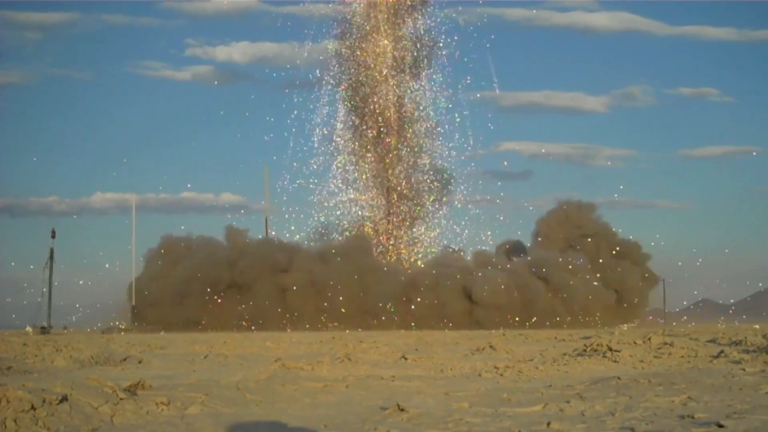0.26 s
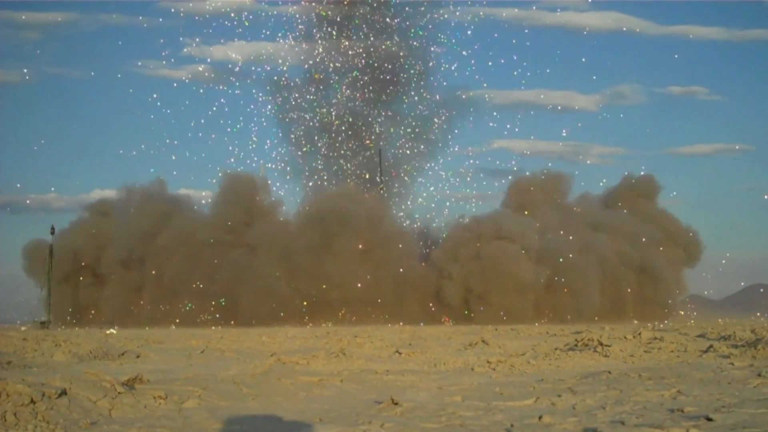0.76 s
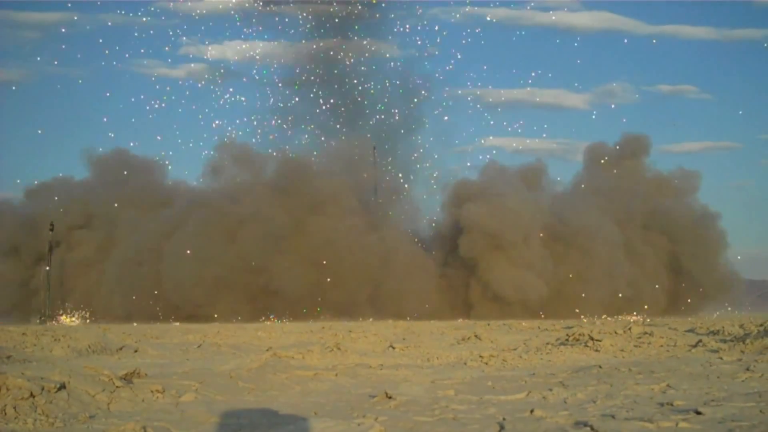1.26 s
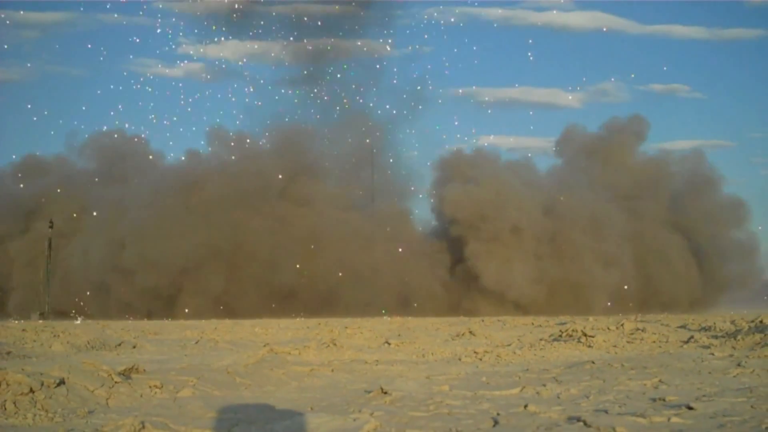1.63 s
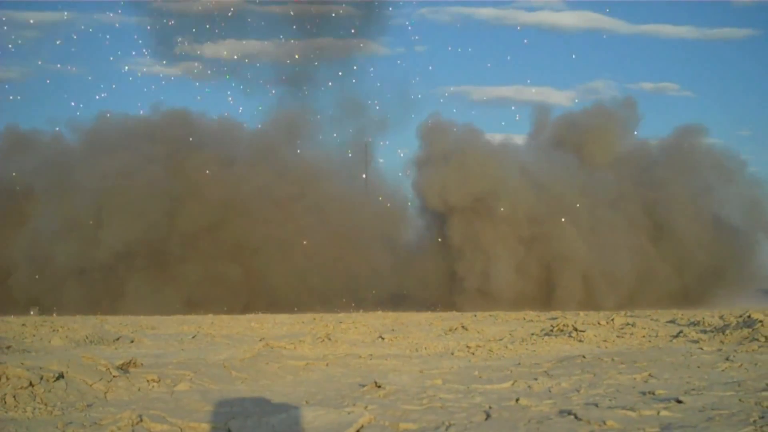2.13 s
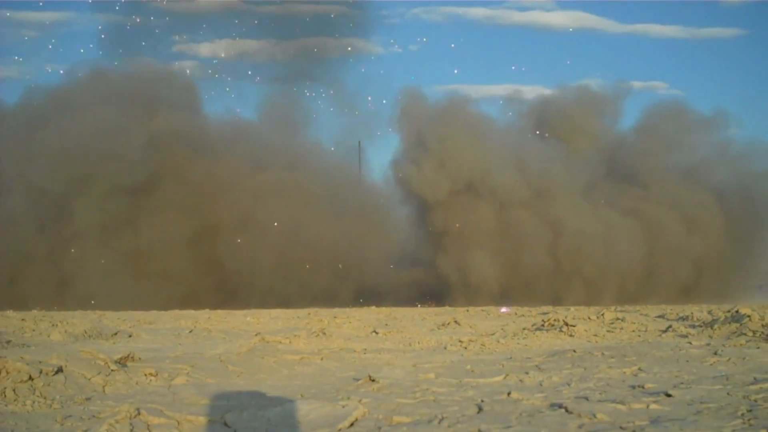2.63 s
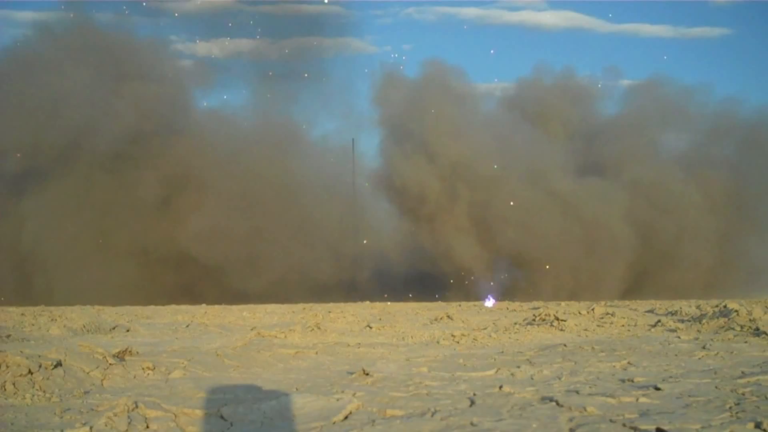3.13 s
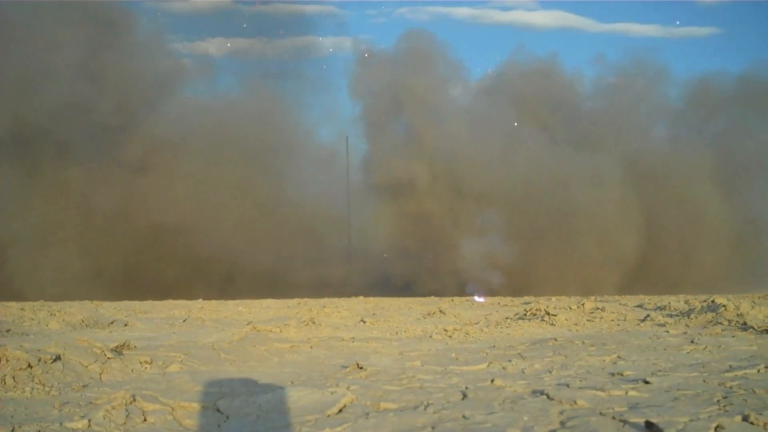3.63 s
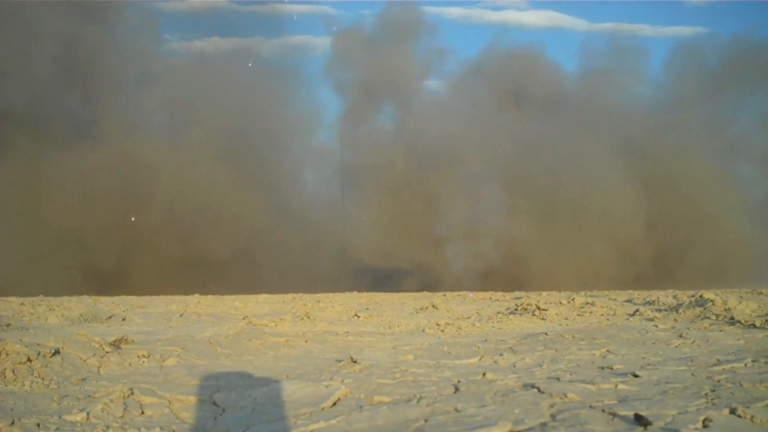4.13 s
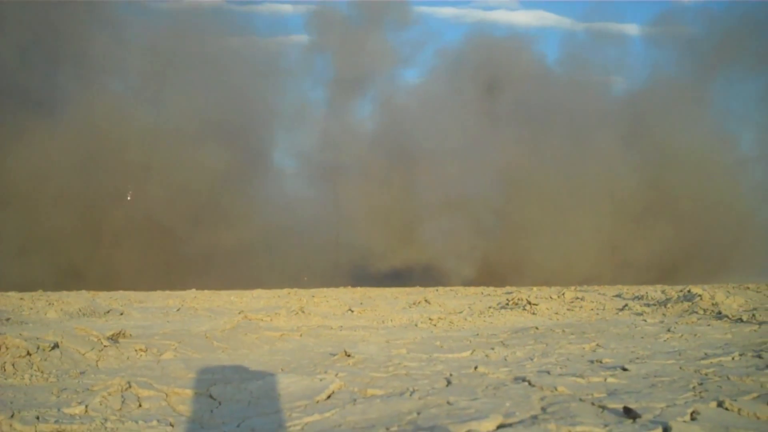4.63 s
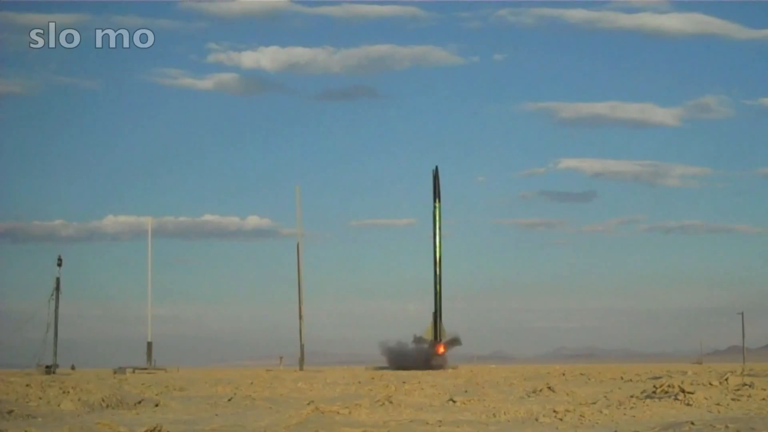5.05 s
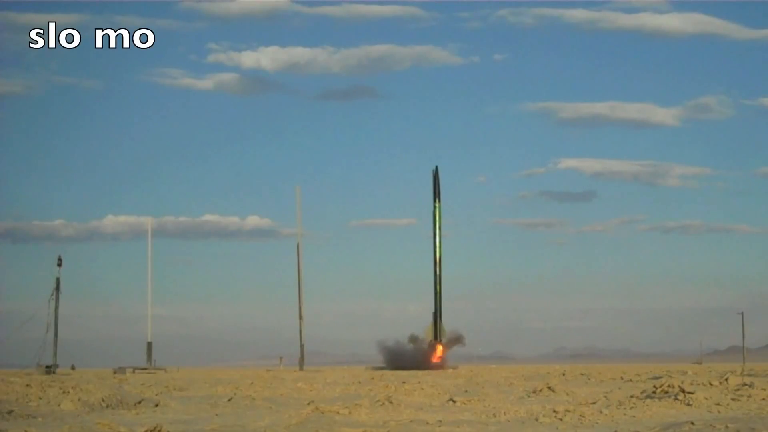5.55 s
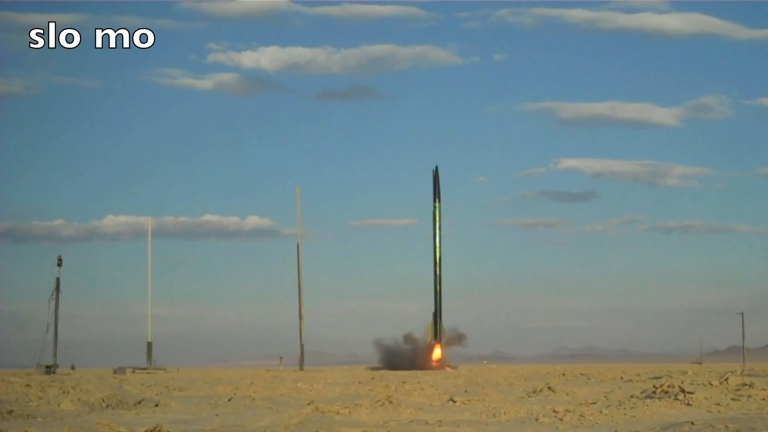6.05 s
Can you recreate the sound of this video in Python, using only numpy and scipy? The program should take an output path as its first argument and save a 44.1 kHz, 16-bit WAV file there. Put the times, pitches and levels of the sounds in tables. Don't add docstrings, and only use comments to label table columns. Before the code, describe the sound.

Harsh liftoff hiss turns to deep rumbling roar with sharp crackles and fizzing sparks, fades, then a slowed-down igniter hiss, soft thud and low gusts.

```python
import sys
import numpy as np
from scipy import signal
from scipy.io import wavfile
from scipy.ndimage import uniform_filter1d

SR = 44100
rng = np.random.default_rng(int(sys.argv[2]) if len(sys.argv) > 2 else 0)


def digitize_waveform(pressure):
    field = np.atleast_2d(pressure).T
    bounded = np.clip(field, -1, 1)
    quanta = np.round(bounded * 32767).astype(np.int16)
    wavfile.write(sys.argv[1], SR, quanta)


def to_linear_factor(level_db):
    exponent = np.asarray(level_db, float) / 20
    return 10 ** exponent


N = 277428
TIME = np.arange(N) / SR

CUT_S, FADE_S = 4.925, 0.096
SLOW, TOP_HZ = 4, 14120
ECHO_MS = .444
THUD_S = 5.578
SINCE_THUD_S = np.maximum(TIME - THUD_S, 0)
LIT = SINCE_THUD_S > .017


def columns(table, t=TIME):
    s, *rest = np.transpose(table)
    return [np.interp(t, s, c) for c in rest]


def bumps(table, t):
    return sum(size * np.exp(-((t - s) / half_s) ** 2) for s, size, half_s in table)


def noise(lo_hz, hi_hz, order=2):
    band = signal.butter(order, [lo_hz, hi_hz], "band", fs=SR, output="sos")
    x = signal.sosfilt(band, rng.standard_normal(N))
    return x / x.std()


def walk(rate_hz):
    k = int(SR / rate_hz)
    held = np.repeat(rng.standard_normal(N // k + 1), k)
    return 1.7 * uniform_filter1d(uniform_filter1d(held, k), k)[:N]


def grains(per_s, scatter_db):
    chance = rng.random((3, N))
    size = to_linear_factor(-scatter_db * np.log(1 - chance[2]))
    x = (chance[0] < per_s / SR) * np.sign(chance[1] - .5) * size
    return x / x.std()


def pair(a, b, like):
    like = np.clip(like, 0, 1)
    return np.sqrt((1 + like) / 2) * a + np.sqrt((1 - like) / 2) * b * np.array([[1], [-1]])


def clicks(table, lo_hz, hi_hz, tail_s):
    out = np.zeros((2, N))
    for s, db, *pan_db in table:
        after = TIME - s
        side_db = np.array([[.5], [-.5]]) * sum(pan_db)
        out += to_linear_factor(db + side_db) * (after >= 0) * np.exp(-np.maximum(after, 0) / tail_s)
    return out * noise(lo_hz, hi_hz)


def recorder_hiss():
    replay_hiss = to_linear_factor(-58) * rng.standard_normal((2, N)) * np.clip((TIME - CUT_S) / .04, 0, 1)
    top_cut = signal.ellip(12, .2, 70, TOP_HZ / SLOW, fs=SR, output="sos")
    replay_hiss = signal.sosfilt(top_cut, replay_hiss)
    floor_db = -65.5 - 16 * np.clip(1 - (TIME - 1.8) / 1.3, 0, 1)
    fade = np.clip((CUT_S - TIME) / FADE_S, 0, 1)
    floor = np.array([noise(8000, TOP_HZ, order=6) for _ in range(2)])
    return replay_hiss + to_linear_factor(floor_db) * fade * floor


def igniter_hiss():
    igniter_db = -42.5 - 11 * abs(TIME - 5.19)
    ember_db = -57.5 - 33 * abs(TIME - 5.95)
    hiss_db = np.where(LIT, ember_db, igniter_db)
    hiss = pair(noise(1200, 2230), noise(1100, 2200), 1.0) * to_linear_factor(hiss_db - 2.5 + 1.0 * walk(26))
    thin = pair(noise(1750, 2110), noise(1700, 1720), 0.64) * to_linear_factor(hiss_db - 0.5 + 2.8 * walk(25))
    return np.where(LIT, to_linear_factor(-14.5) * hiss + thin, hiss)


def low_rush():
    rush_db, ducked_db, left_db, recover_s = -55, -66, -59.5, 0.187
    recovering_db = left_db + (ducked_db - left_db) * np.exp(-SINCE_THUD_S / recover_s)
    level_db = np.where(LIT, recovering_db, rush_db) + 1.5 * walk(15)
    return pair(noise(310, 830, order=1), noise(270, 1300, order=1), 0.862) * to_linear_factor(level_db + 5.0)


def thrust_gusts():
    # (time [s], peak [dB], half length [s])
    gust_table = [(4.967, -46, .02), (5.144, -48, 0.102), (5.29, -41.5, 0.0487), (5.38, -43.5, .04),
                  (5.604, -38.5, 0.026), (5.75, -53, 0.138), (5.952, -45, 0.0363), (6.058, -43, 0.0223),
                  (6.15, -39.5, 0.046), (6.241, -42, .05)]
    gust = to_linear_factor(-60) + bumps([(s, to_linear_factor(db), half_s) for s, db, half_s in gust_table], TIME)
    return pair(noise(16, 130, order=3), noise(28, 140, order=3), 0.99) * gust


def thud():
    # (frequency [Hz], level [dB], t60 [s])
    modes = [(35, 3, 1), (61.2, -13, 0.31), (116.7, -0.5, 0.27)]
    ringing = sum(to_linear_factor(-27 + db - 60 * SINCE_THUD_S / t60_s) * np.sin(2 * np.pi * hz * SINCE_THUD_S)
                  for hz, db, t60_s in modes)
    return ringing * (1 - 0.646 * np.exp(-SINCE_THUD_S / 0.067))


def replay():
    # (time [s], peak [dB])
    tick_table = [(5.9652, -42), (6.1075, -49), (6.1584, -37.5), (6.2394, -49)]
    start = np.clip((TIME - CUT_S) / 0.065, 0, 1) ** 2
    ring = pair(noise(1010, 1098), noise(1010, 1130), 0.87) * to_linear_factor(-63.5 + 3 * walk(25))
    ring = ring * (TIME > 5.84) * (TIME < 6.2)
    ticks = clicks(tick_table, 880, 2900, 0.0054) * to_linear_factor(-6.5)
    flow = (igniter_hiss() + low_rush()) * start
    return (flow + ring + thrust_gusts() + thud() + ticks) * (TIME >= CUT_S)


def sparks():
    # (lands [s], dies [s], level [dB])
    showers = [(2.2, 4.4, -59), (2.72, 3.25, -57), (3.36, 5, -51)]
    # (time [s], peak [dB], left minus right [dB])
    pop_table = [(2.4834, -38, -3.5), (2.6594, -46, -4), (3.495, -33.5, 2.5), (3.6805, -43, 2.5),
                 (3.7374, -39.5, 1), (3.8866, -31, 5), (4.1503, -41, -9), (4.3884, -39, 1)]
    land_s, die_s, burn_db_per_s = 0.25, .3, 5
    burn = 0
    for s, end_s, db in showers:
        gate = np.clip(np.minimum((TIME - s) / land_s, (end_s - TIME) / die_s + 1), 0, 1)
        burn = burn + to_linear_factor(db - burn_db_per_s * (TIME - s)) * gate
    fizz = [rng.standard_normal(N) + .45 * grains(1500, 2.2) for _ in range(2)]
    band = signal.butter(1, [5000, 10000], "band", fs=SR, output="sos")
    thin = signal.sosfilt(band, pair(*fizz, 0.63))
    pops = clicks(pop_table, 3500, 11000, .002) * to_linear_factor(-3)
    return thin * to_linear_factor(9.0 + 0.54 * walk(9)) * burn + pops


def shocks():
    # (time [s], signed peak [full scale], length [ms], gain drop after it [dB])
    shock_table = [(.798, -.45, 7, 2), (.917, .35, 6, 1), (1.106, -.4, 7, 2), (1.228, .5, 5, 3.5),
                   (1.317, .75, 8, 8), (1.552, -.6, 6, 7), (1.83, -.4, 5, 1), (1.906, .6, 5, 5),
                   (2.107, .45, 5, 3), (2.399, -.5, 5, 1.5), (2.467, .65, 4, 1), (2.486, .8, 5, 6),
                   (2.683, .5, 5, 2.5), (2.862, -.45, 5, 1.5), (3.017, -.5, 5, 1.5), (3.144, -.55, 5, 1.5),
                   (3.217, -.6, 5, 4), (3.455, -.5, 5, 1.5), (3.738, -.6, 4, 1.5), (3.853, .45, 4, 1),
                   (3.918, .3, 4, 3), (4.221, -.2, 4, 2)]
    attack_s, recover_s = 0.00067, 0.19
    swing, drop_db = np.zeros(N), np.zeros(N)
    for s, peak, ms, db in shock_table:
        u = (TIME - s) * 1000 / ms
        swing += peak * np.exp(-(u / .5) ** 2) * np.cos(2 * np.pi * u - .5)
        after = np.maximum(TIME - s - ms / 4000, 0)
        drop_db += db * (1 - np.exp(-after / attack_s)) * np.exp(-(after / recover_s) ** 1.66)
    return swing, to_linear_factor(-drop_db)


def climb(t):
    # (time [s], level [dB])
    thrust = [(0, -21.5), (.2, -24.5), (.45, -19), (.6, -13), (.85, -13.5), (1.15, -15), (1.4, -11),
              (1.7, -13.5), (2.0, -14.5), (2.5, -11), (2.9, -13), (3.2, -11.5), (3.5, -13.5), (3.8, -15),
              (4.0, -15.5), (4.25, -19), (4.6, -20.5), (4.93, -23)]
    # (time [s], swell [dB], half length [s])
    puffs = [(0, 6.5, 0.093), (.33, 8, 0.081), (.63, 2.5, 0.065)]
    rise = 0.18 + 1.202 * t + 0.43 * t ** 2
    pads = np.sqrt(1 + rise ** 2)
    thrust_db = columns(thrust, t)[0]
    rumble_db = thrust_db + bumps(puffs, t)
    jet_db = thrust_db - 23.5 + 28 / pads
    lobe_db = 14 * np.exp(-(np.log(rise / 2) / 0.52) ** 2)
    deep_db = thrust_db - 17 - 4 * t + lobe_db
    air_db = np.minimum(2.5 * (pads - 1.333), 22.5)
    unlike_far_db, unlike_near_db = -17.5, -2.5
    unlike_db = unlike_far_db + (unlike_near_db - unlike_far_db) * np.exp(-(rise / 1.72) ** 2)
    share = np.clip(1.25 * rise / pads - .27, 0, .88)
    return (rumble_db, jet_db, deep_db), air_db, unlike_db, ECHO_MS * rise / pads, share


def rocket():
    # (frequency [Hz], level [dB per Hz])
    rumble_spectrum = [(25, -55.5), (60, -24), (100, -3.5), (140, -2.5), (330, -2.5), (550, -5.5),
                       (900, -5.5), (1300, -10.5), (2500, -40.5)]
    # (frequency [Hz], level [dB per Hz])
    jet_spectrum = [(60, -27.5), (300, -6.5), (800, -1), (1400, 2), (2600, 1), (4000, -3), (7000, -3.5),
                    (10000, -7.5), (14500, -10)]
    # (frequency [Hz], level [dB per Hz])
    deep_spectrum = [(12, -30), (25, -28), (45, -7), (70, 14.5), (110, 7.5), (200, -35)]
    gusty = to_linear_factor(0.5 * walk(24.92))
    common = gusty * (rng.standard_normal(N) + .4 * grains(400, 2.2))
    f, t, z = signal.stft(np.vstack([common, gusty * rng.standard_normal(N)]), SR, nperseg=2048)
    f = np.maximum(f, 1)[:, None]
    (rumble_db, jet_db, deep_db), air_db, unlike_db, lag_ms, share = climb(t)
    air = to_linear_factor(-air_db * (f / 4000) ** 1.7)
    soft_rad = .25 * np.minimum(f / 600, 1)
    echo = share ** (1 + f / 6500) * np.exp(-2j * np.pi * f * lag_ms / 1000 - 1j * soft_rad)

    def shape(table):
        hz, db = np.transpose(table)
        return to_linear_factor(np.interp(np.log(f), np.log(hz), db))

    def unit(gain, lo_hz, hi_hz):
        heard = gain * (1 + echo) * (f > lo_hz) * (f < hi_hz)
        return gain / np.sqrt(2 * np.sum(abs(heard) ** 2, axis=0) / 2048)

    beam = to_linear_factor(-1.5 * lag_ms / ECHO_MS * np.log2(np.maximum(f / 3000, 1)))
    low = unit(shape(rumble_spectrum) * air, 80, 800) * to_linear_factor(rumble_db)
    high = unit(shape(jet_spectrum) * air * beam, 1810, 2845) * to_linear_factor(jet_db)
    deep = unit(shape(deep_spectrum), 20, 70) * to_linear_factor(deep_db)
    colour = np.sqrt(low ** 2 + high ** 2 + deep ** 2)
    low_tilt_db = -3.6 * share ** 4 * np.log2(1400 / np.clip(f, 300, 1400))
    deep_tilt_db = 7.1 * np.log2(np.clip(120 / f, 1, 4))
    high_tilt_db = -4.0 * np.log2(np.clip(f, 2200, 5000) / 2200)
    unlike = to_linear_factor(unlike_db + 1.5 + low_tilt_db + deep_tilt_db + high_tilt_db)
    side = unlike * (1 + 0.3 * echo) * z[1] * np.array([1, -1])[:, None, None]
    both = colour * ((1 + echo) * z[0] + side) / np.sqrt(1 + unlike ** 2)
    return signal.istft(both, SR, nperseg=2048)[1][:, :N]


def scene():
    swing, duck = shocks()
    fade = np.clip((CUT_S - TIME) / FADE_S, 0, 1)
    return ((rocket() + sparks()) * duck + swing) * fade + replay()


def mic(x, hz, width_hz, top_hz):
    # (time [s], peak [full scale])
    ceiling = [(0, .74), (.8, .7), (1.2, .92), (6.3, .92)]
    pole = np.exp(2 * np.pi * (-width_hz / 2 + 1j * hz) / SR)
    a = np.real(np.poly([pole, pole.conjugate()]))
    mesh = signal.sosfilt(signal.butter(1, 0.43 * hz, fs=SR, output="sos"), x)
    rung = signal.lfilter([a.sum()], a, mesh)
    treble = uniform_filter1d(np.abs(np.diff(rung, prepend=0)), size=1000)
    overdriven = rung + to_linear_factor(10.5) * treble ** 2 * rng.standard_normal(N)
    rounded = overdriven / (1 + np.abs(overdriven / columns(ceiling)[0]) ** 4) ** (1 / 4)
    return signal.sosfilt(signal.ellip(8, .2, 70, top_hz, fs=SR, output="sos"), rounded)


def band_limit(x):
    return signal.sosfilt(signal.butter(12, 14230, fs=SR, output="sos"), x)


def record(dry):
    # (resonance [Hz], width [Hz], level [dB])
    ports = [(7840, 1500, 0), (6480, 1320, 0.77)]
    live = TIME < CUT_S
    out = []
    for x, (hz, width_hz, db) in zip(dry, ports):
        launch = mic(x * live, hz, width_hz, TOP_HZ)
        slowed = mic(x * ~live, hz / SLOW, width_hz / SLOW, TOP_HZ / SLOW)
        out.append(to_linear_factor(db) * (launch + slowed))
    mix = np.array(out) + recorder_hiss()
    return band_limit(mix)


dry = scene()
out = record(dry)
digitize_waveform(out)
```